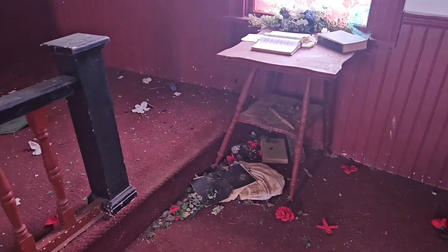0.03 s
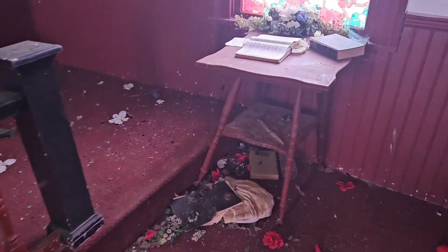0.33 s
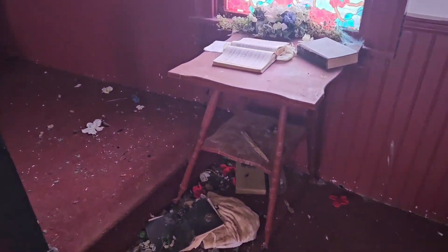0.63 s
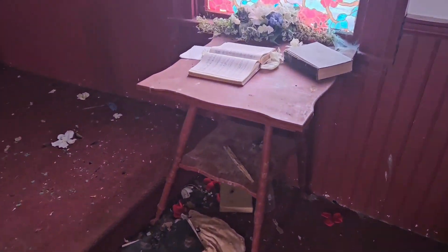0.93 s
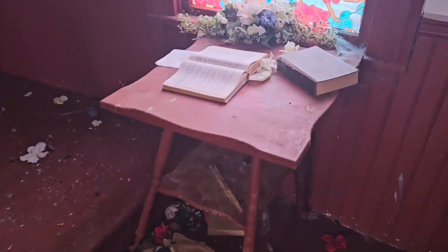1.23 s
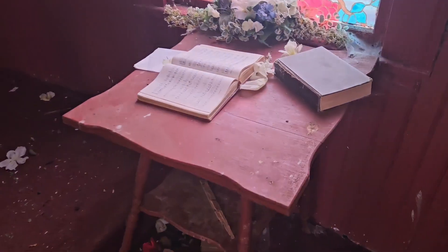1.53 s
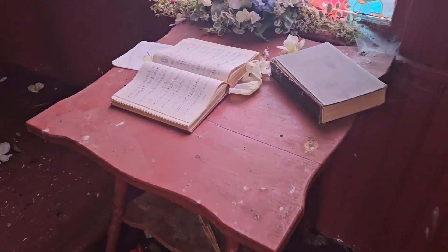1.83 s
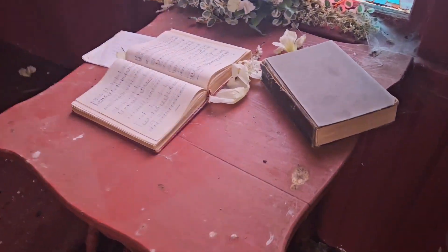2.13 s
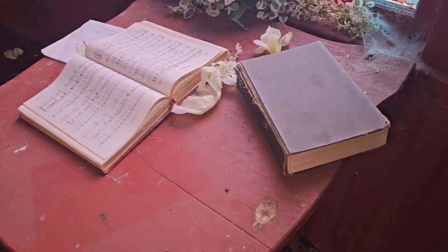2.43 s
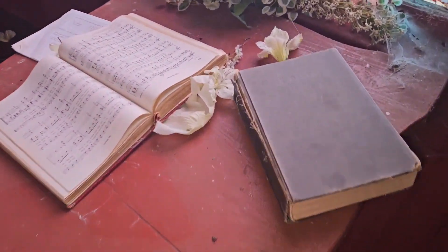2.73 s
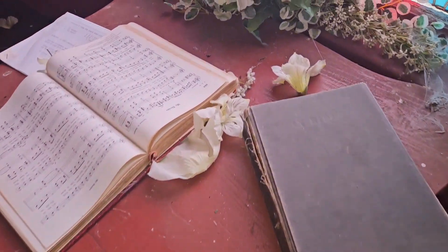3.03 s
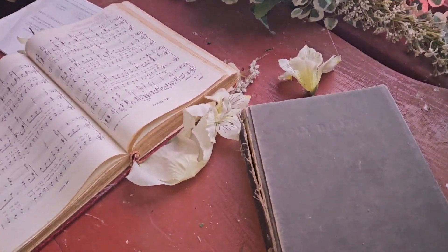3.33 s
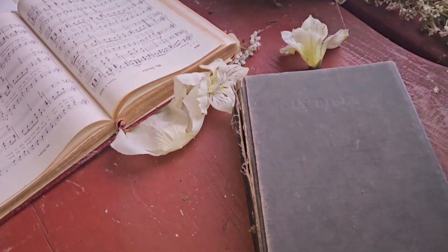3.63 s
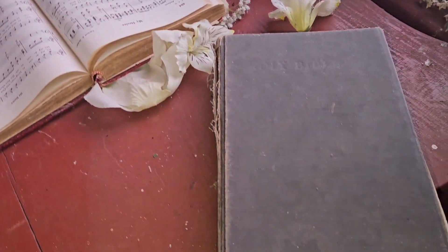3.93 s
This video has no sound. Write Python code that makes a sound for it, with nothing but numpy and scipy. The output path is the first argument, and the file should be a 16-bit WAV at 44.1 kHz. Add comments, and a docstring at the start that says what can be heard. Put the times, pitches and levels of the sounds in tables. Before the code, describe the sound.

Slow footsteps thud and knock on an old carpeted wooden floor in an empty hall. Debris snaps underfoot and clothes swish softly. Near the end, a finger taps and rubs beside the hand-held microphone.

```python
"""Slow steps on an old carpeted wooden floor in an empty hall, heard from a hand-held phone.
Each step thuds in the joists, knocks a board and may snap debris or crunch grit; clothes swish between.
The hall echoes briefly over a faint rumble and hiss of air.
Near the end a finger taps and rubs the case beside the right microphone."""
import sys
import numpy as np
from scipy import signal
from scipy.fft import rfft, irfft
from scipy.io import wavfile

SR = 44100
rng = np.random.default_rng(int(sys.argv[2]) if len(sys.argv) > 2 else 0)


def transcribe(u):
    """Save the signal u as a 16-bit wav file named by the first command-line argument.

    u: samples, shape (n,) or (channels, n), limited to [-1, 1]; the rate is SR.
    q: integer samples, one column per channel.
    """
    v = np.clip(np.atleast_2d(u).T, -1, 1)
    q = np.round(v * 32767).astype(np.int16)
    wavfile.write(sys.argv[1], SR, q)


N = 176400
T = np.arange(N) / SR
FREQS_HZ = np.fft.rfftfreq(2 * N, 1 / SR)

# Still air. Each row: frequency in Hz, relative density in dB.
AIR_SPECTRUM = [(20, -9), (40, 4), (62, 0.5), (110, 0), (200, -16), (500, -17.5), (1000, -26),
                (3000, -31.5), (8000, -36.5), (15500, -47.5)]
# Debris snapping. Each row: start in seconds, gain in dB, lower and upper ring in Hz, ring t60 in
# seconds, hollow body and tail in relative dB, treble cutoff in Hz, hall send in dB.
DEBRIS_SNAPS = [(0.0118, -22.5, 4580, 5390, 0.0038, -20.5, -45.5, 12300, -5.5),
                (0.358, -40.5, 4840, 9000, 0.0034, -33, -60, 15000, 6),
                (1.274, -27.5, 3900, 5200, 0.0023, -25, -60, 14000, -9),
                (1.624, -48.5, 4400, 4960, 0.008, -9, -38, 9000, -3),
                (2.2598, -19, 2870, 4230, 0.0044, -35, -75, 4670, -11.5)]
# A crack. Each row: frequency in Hz, gain in dB.
CRACK_SPECTRUM = [(300, -25), (1500, -7), (2800, 0), (5000, -2), (8000, -4), (10000, -15), (15000, -14)]
# Hall decay. Each row: frequency in Hz, t60 in seconds.
HALL_DECAY = [(60, 0.53), (150, 0.6), (400, 0.39), (1000, 0.73), (2500, 0.39), (6000, 0.15), (14000, 0.25)]
# Clothes brushing. Each row: peak time in seconds, rustle and hiss gain in dB, rise and fall in seconds.
CLOTH_SWISHES = [(.325, -63.5, -55.5, 0.013, 0.037), (.365, -59, -55, 0.015, 0.067),
                 (.52, -63.5, -69, 0.11, 0.17), (.86, -70, -71.5, 0.041, 0.1),
                 (.96, -59, -59, 0.028, 0.076), (1.069, -63, -57, 0.036, 0.04),
                 (1.25, -54, -49, 0.05, 0.051), (1.392, -68, -68.5, 0.042, 0.11),
                 (1.57, -66, -78, 0.024, 0.089), (1.731, -71.5, -75, 0.038, 0.044),
                 (1.83, -60.5, -67, 0.025, 0.019), (2.03, -64.5, -67.5, 0.015, 0.18),
                 (2.145, -71, -62, 0.022, 0.036), (2.34, -62.5, -68.5, 0.069, 0.096),
                 (2.55, -63, -63.5, 0.096, 0.085), (2.819, -61, -65.5, 0.075, 0.074),
                 (3.19, -60.5, -60, 0.18, 0.11), (3.47, -60, -59, 0.093, 0.069),
                 (3.86, -68, -69, 0.42, 0.13)]
# Cloth friction. Each row: frequency in Hz, relative density in dB.
CLOTH_SPECTRUM = [(200, 9.5), (600, 9), (1300, 8.5), (2500, 4), (5000, -0.5), (8000, 1.5), (10000, -6),
                  (12500, -1), (15500, -5.5)]
# Grit under the sole. Each row: start in seconds, gain in dB, length in seconds, spectral peak in Hz.
GRIT_CRUNCHES = [(0.349, -27, .024, 8600), (.944, -18, .02, 4640)]
# Weight landing. Each row: start in seconds, level in dB, pitch in Hz, rise in seconds.
FLOOR_THUDS = [(0.368, -34.5, 92.7, 0.02), (0.431, -34.5, 85, 0.0088), (0.684, -44.5, 93.5, 0.012),
               (0.957, -35.5, 75.6, 0.01), (1.037, -47.5, 64.3, 0.0218), (1.154, -29.5, 68, 0.011),
               (1.3, -42, 87.4, 0.019), (1.428, -50.5, 60, 0.022), (1.972, -26.5, 74.3, 0.019),
               (1.998, -40, 54, 0.031), (2.033, -40.5, 62.3, 0.02), (2.358, -37, 75.6, .011),
               (2.784, -45, 95, 0.03), (2.828, -31.5, 83, 0.014), (3.271, -50.5, 132.5, 0.015),
               (3.366, -47.5, 62.8, 0.027), (3.551, -37, 101.2, 0.0055)]
# Joist modes. Each row: frequency in Hz, relative level in dB, t60 in seconds.
JOIST_MODES = [(51, -8.5, 0.39), (54, 1.5, 0.21), (68, 0.5, 0.13), (90.5, -13, 0.29), (123.3, -2, 1)]
# Shoe on a board. Each row: start in seconds, bass, body, presence and treble in dB, scuff decay in
# seconds, scuff re blow in dB, ring gain in dB, board pitch in Hz, hall send in dB.
SHOE_KNOCKS = [(0.445, 0, -7.5, -20.5, -29, 0.0064, -3.5, -40.5, 147.7, 7.5),
               (0.682, -13.5, -27, -30, -62, 0.0081, 4, -58.5, 143, -4),
               (.928, -8.5, -1, -11, -21.5, 0.0062, -5.5, -47.5, 233.2, 2.5),
               (0.954, 7.5, -18, -13, -20, 0.0057, 1, -48.5, 266.6, 1),
               (0.992, -8, -12, -15.5, -31, 0.0011, 10, -50.5, 174.7, -10),
               (1.303, -2.5, -8, -17.5, -28.5, 0.0075, -2.5, -50.5, 163.6, 1.5),
               (1.823, -17, -9, -29, -32.5, 0.014, 2, -65.5, 274, -8),
               (1.981, 2, -8, -14, -24.5, 0.0046, 0.5, -52, 512.6, 1.5),
               (2.028, -5, -19, -26, -45, 0.003, 7, -52.5, 251.5, 2.5),
               (2.259, 10, -43, -10, -24, 0.0019, 8, -47.5, 224, 4.5),
               (2.277, -3, -29, -48, -55, 0.0018, -9, -42.5, 176.4, -3),
               (2.37, -5, -37, -34, -37, 0.0044, 2, -67, 156, 1),
               (2.833, 8.5, 2.5, -1.5, -20, 0.0041, -5, -39, 147.2, -4.5),
               (2.905, 0, -6, -15.5, -42, 0.004, 3, -43.5, 149.8, -2.5),
               (2.972, -6, -15, -29, -33, 0.004, 1, -55, 314, -8)]
# Board modes. Each row: multiple of the pitch, relative level in dB, t60 in seconds.
BOARD_MODES = [(1.002, 4, 0.24), (1.5, 0, 0.04), (2.018, -11, 0.46), (2.45, -12, 0.3), (3.029, -24, 1),
               (4.43, -12, 0.43)]
# Finger on the case. Each row: start in seconds, bass, middle and treble in dB, scuff decay in seconds.
FINGER_TAPS = [(3.443, 5.5, -3, -26.5, 0.012), (3.565, -18, -12, -17.5, 0.0011),
               (3.569, -9, -30, -17, 0.0022), (3.634, 5, -10.5, -36, 0.03), (3.7135, 4, -3.5, -14, 0.0017),
               (3.76, -22, 4, -14.5, 0.002), (3.815, 3, -11, -27, 0.0077)]
# Finger sliding. Each row: time in seconds, bass, middle, treble and top hiss in dB before band gain.
RUB_ENVELOPE = [(3.559, -66, -89, -87, -81), (3.569, -53, -59, -68, -70), (3.579, -87, -66.5, -69, -81),
                (3.61, -58.5, -63, -59.5, -74), (3.762, -39, -45, -56.5, -62), (3.772, -43, -61, -90, -87),
                (3.788, -43, -56.5, -88, -93), (3.813, -42.5, -45.5, -64, -57),
                (3.848, -33, -41.5, -67, -64), (3.901, -31.5, -37.5, -65, -55), (3.984, -43, -50, -77, -77),
                (4.0, -50, -60, -72, -79)]
# Those four bands. Each row: low and high edge in Hz, gain in dB.
RUB_BAND_GAINS = [(44.7, 440, 4.5), (497, 1780, 3), (2500, 9200, 4), (12200, 21000, 5.5)]
# Skin friction. Each row: frequency in Hz, relative density in dB.
RUB_SPECTRUM = [(24, -33), (40, 0.5), (117, 5), (188, -3.5), (438, -12), (472, -19.5), (606, -17.5),
                (686, -22), (1380, -28.5), (4800, -17), (6800, -25), (9300, -45), (12400, -21.5),
                (15500, -19)]
# Likeness of the two microphones. Each row: frequency in Hz, correlation.
MIC_CORRELATION = [(50, 0.96), (150, 0.92), (400, 0.76), (1000, 0.23), (3000, 0.072), (12000, 0.017)]


def undb(db):
    return 10 ** (np.asarray(db) / 20)


def unit_rms(x):
    return x / np.sqrt(np.mean(x ** 2))


def unit_energy(x):
    return x / np.sqrt(np.sum(x ** 2))


def on_log(points, hz):
    """Read (Hz, value) points on a log-frequency axis."""
    knots_hz, values = np.array(points, float).T
    return np.interp(np.log(np.maximum(hz, 1)), np.log(knots_hz), values)


def shape(x, gain):
    """Filter by a gain per frequency."""
    return irfft(rfft(x, 2 * N) * gain)[..., :N]


def band(lo_hz, hi_hz):
    """Gain of a steep band-pass."""
    return 1 / np.sqrt((1 + (lo_hz / (FREQS_HZ + 1)) ** 8) * (1 + (FREQS_HZ / hi_hz) ** 8))


def cut(x, kind, hz):
    """Second-order low- or high-pass."""
    return signal.sosfilt(signal.butter(2, hz, kind, fs=SR, output="sos"), x)


def pulse(spectrum, size=2048):
    """Minimum-phase click with a (Hz, dB) spectrum."""
    gain = undb(on_log(spectrum, np.fft.rfftfreq(size, 1 / SR)))
    cepstrum = irfft(np.log(gain))
    cepstrum[1:size // 2] *= 2
    cepstrum[size // 2 + 1:] = 0
    return irfft(np.exp(rfft(cepstrum)))


def ring(modes, size=32768):
    """Sum of decaying sines."""
    t = T[:size]
    return sum(undb(db) * np.sin(2 * np.pi * hz * t) * undb(-60 * t / t60_s) for hz, db, t60_s in modes)


def add(out, at_s, x):
    i = max(int(at_s * SR), 0)
    out[i:i + len(x)] += x[:max(N - i, 0)]


def stereo(noises):
    """Two unrelated noises as left and right, alike in the bass."""
    likeness = np.clip(on_log(MIC_CORRELATION, FREQS_HZ), 0, .99)
    mid, side = shape(noises, np.sqrt(np.array([1 + likeness, 1 - likeness]) / 2))
    return np.array([mid + side, mid - side])


def air(level_db=-61.5):
    """Faint rumble and hiss of the empty building."""
    noise = stereo(rng.standard_normal((2, N)))
    return undb(level_db) * unit_rms(shape(noise, undb(on_log(AIR_SPECTRUM, FREQS_HZ))))


def contact(spectrum, scuff_s, scuff_db=2.5, spread_db=2.8, size=4096):
    """A blow, then a brief scatter of tiny slips with little bass."""
    slips = rng.standard_normal(size) * undb(spread_db * rng.exponential(size=size))
    slips = cut(slips * np.exp(-T[:size] / scuff_s), "high", hz=525)
    force = undb(scuff_db) * unit_energy(slips)
    force[0] += 1  # the blow
    return signal.fftconvolve(force / np.sqrt(1 + undb(scuff_db) ** 2), pulse(spectrum))


def snaps(body_hz=955, body_t60_s=.022, tail_t60_s=.45, crack_db=9, size=16384):
    """Brittle bits crack, ring and leave a faint beating tone. Returns direct sound, duller hall send."""
    direct, send = np.zeros((2, N))
    treble_shelf = np.maximum(band(0, hi_hz=3630), undb(-7))
    for at_s, db, lower_hz, upper_hz, t60_s, body_db, tail_db, top_hz, hall_db in DEBRIS_SNAPS:
        tail = [(hz * detune, tail_db, tail_t60_s) for hz in (lower_hz, upper_hz) for detune in (1, 1.016)]
        click = ring([(lower_hz, 0, t60_s), (body_hz, body_db, body_t60_s)], size)
        click -= ring([(upper_hz, 0, t60_s)] + tail, size)
        add(click, 0, undb(crack_db) * contact(CRACK_SPECTRUM, scuff_s=.002))
        click = cut(click, "low", top_hz)
        add(direct, at_s, undb(db) * click)
        add(send, at_s, undb(db + hall_db) * shape(click, treble_shelf))
    return direct, send


def hall(onset_s=.00067):
    """Diffuse echo as a 1 s impulse response; each band decays at its own rate."""
    noise = stereo(rng.standard_normal((2, N)))
    response = 0
    for band_hz, t60_s in HALL_DECAY:
        share = on_log([(hz, hz == band_hz) for hz, _ in HALL_DECAY], FREQS_HZ)
        fade = undb(-60 * T / t60_s) * (1 - np.exp(-T / onset_s))
        response += shape(noise, share) * unit_energy(fade)
    return response[:, :SR]


def clothes(grain_db=4, split_hz=3970, balance_db=(-1, .6)):
    """Fibres catch and slip as the limbs swing: dull rustle, fine hiss."""
    fibres = rng.standard_normal((2, N)) * undb(grain_db * np.minimum(rng.exponential(size=(2, N)), 5))
    cloth = unit_rms(shape(stereo(fibres), undb(on_log(CLOTH_SPECTRUM, FREQS_HZ))))
    rustle = shape(cloth, band(0, split_hz))
    hiss = cloth - rustle
    power = 0
    for peak_s, rustle_db, hiss_db, rise_s, fall_s in CLOTH_SWISHES:
        swell = np.exp(-((T - peak_s) / np.where(T < peak_s, rise_s, fall_s)) ** 2)
        power += undb([[rustle_db], [hiss_db]]) ** 2 * swell
    return (rustle * np.sqrt(power[0]) + hiss * np.sqrt(power[1])) * undb(balance_db)[:, None]


def grit(crumbs_per_s=190, spread_db=8):
    """Plaster crumbs crunch under the sole in a quick run of tiny cracks."""
    out = np.zeros(N)
    for at_s, db, length_s, hz in GRIT_CRUNCHES:
        crumb = pulse([(hz / 4, -14), (hz / 2, -7), (hz, 0), (2 * hz, -13)])
        count = int(length_s * crumbs_per_s)
        for k, (jitter, weakness) in enumerate(rng.random((count, 2))):
            add(out, at_s + length_s * (k + jitter) / count, undb(db - spread_db * weakness) * crumb)
    return out


def thuds(joist_db=-59):
    """The floor swings a few times under the weight; the joists ring on."""
    floor, t = np.zeros(N), T[:SR // 4]
    for at_s, db, hz, rise_s in FLOOR_THUDS:
        swell = (t / rise_s * np.exp(1 - t / rise_s)) ** 4
        add(floor, at_s, undb(db) * swell * np.cos(2 * np.pi * hz * (t - rise_s)))
    return floor + undb(joist_db) * signal.fftconvolve(floor, ring(JOIST_MODES))[:N]


def add_graze(out, blow_s, spectrum, gain_db=-18, rise_s=.0061, size=2048):
    """Fibres crush just before a blow: a short swell of noise."""
    swell = unit_energy(rng.standard_normal(size) * np.exp(-T[:size] / rise_s)[::-1])
    add(out, blow_s - size / SR, undb(gain_db) * signal.fftconvolve(swell, pulse(spectrum)))


def knocks():
    """A shoe strikes through the carpet and rings a board. Returns direct sound, hall send."""
    direct, send = np.zeros((2, N))
    for at_s, bass, body, presence, treble, scuff_s, scuff_db, ring_db, hz, hall_db in SHOE_KNOCKS:
        spectrum = [(60, bass - 18), (150, bass - 3), (300, bass), (470, (bass + body) / 2 - 2),
                    (660, body), (1050, (body + presence) / 2 - 2.5), (1500, presence),
                    (2000, presence - 7), (2800, (presence + treble) / 2), (3800, treble),
                    (8000, treble - 12), (15000, treble - 16)]
        blow = contact(spectrum, scuff_s, scuff_db)
        # a brighter blow wakes stronger overtones
        modes = [(hz * ratio, db + on_log(spectrum, hz * ratio) - on_log(spectrum, hz), t60_s)
                 for ratio, db, t60_s in BOARD_MODES]
        add_graze(direct, at_s, spectrum)
        add(direct, at_s, blow)
        add(direct, at_s, undb(ring_db) * ring(modes))
        add(send, at_s, undb(hall_db) * blow)
    return direct, send


def finger_taps(left_db=-28):
    """Skin taps the case by the right microphone."""
    taps = np.zeros(N)
    for at_s, bass, middle, treble, scuff_s in FINGER_TAPS:
        spectrum = [(40, bass - 10), (120, bass), (320, bass - 1), (700, middle + 1), (1600, middle - 2),
                    (4500, treble), (10000, treble - 16), (13500, treble - 5)]
        add_graze(taps, at_s, spectrum)
        add(taps, at_s, contact(spectrum, scuff_s))
    return np.array([undb(left_db) * taps, taps])


def finger_rub(slips_per_s=5000, grain_db=2.8, left_db=-44):
    """Skin sticks and slips along the case by the right microphone."""
    slips = (rng.random(N) < slips_per_s / SR) * rng.standard_normal(N)
    slips *= undb(grain_db * np.minimum(rng.exponential(size=N), 4))
    colour = undb(on_log(RUB_SPECTRUM, FREQS_HZ))
    times_s, *curves_db = np.array(RUB_ENVELOPE).T
    rub = 0
    for (lo_hz, hi_hz, gain_db), curve_db in zip(RUB_BAND_GAINS, curves_db):
        envelope = undb(gain_db + np.interp(T, times_s, curve_db, left=-140))
        rub += unit_rms(shape(slips, colour * band(lo_hz, hi_hz))) * envelope
    return np.array([undb(left_db) * rub, rub])


def scene(thud_send_db=-4, cloth_send_db=-10, left_lag_s=.00014, balance_db=(-1.2, .8)):
    """Steps and clothes sound in the hall; the finger reaches the microphone through the case."""
    response, thud = hall(), thuds()
    knock, knock_send = knocks()
    snap, snap_send = snaps()
    cloth = clothes()
    send = undb(thud_send_db) * thud + knock_send + snap_send + undb(cloth_send_db) * cloth[0]
    echo = signal.fftconvolve(send[None], response, axes=1)[:, :N]
    # close sounds reach the right microphone first
    delay = np.exp(-2j * np.pi * FREQS_HZ * np.array([[left_lag_s], [0]]))
    close = shape(knock + snap + grit(), delay) * undb(balance_db)[:, None]
    return thud + close + cloth + echo + finger_taps() + finger_rub() + air()


def record(dry):
    """The phone cuts the top with a steep low-pass."""
    top_hz = 15550
    return signal.sosfilt(signal.ellip(10, .2, 70, top_hz, fs=SR, output="sos"), dry)


dry = scene()
out = record(dry)
transcribe(out)
```